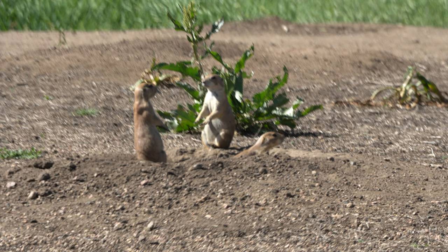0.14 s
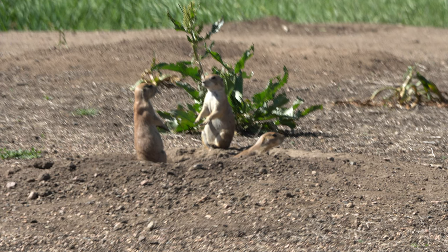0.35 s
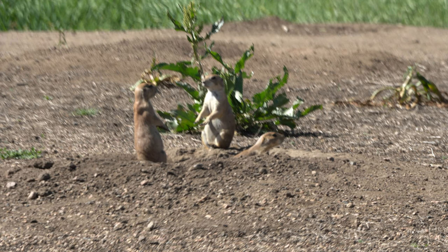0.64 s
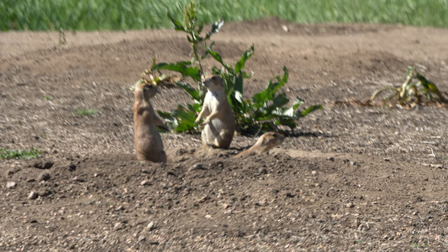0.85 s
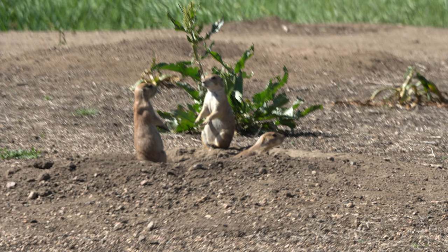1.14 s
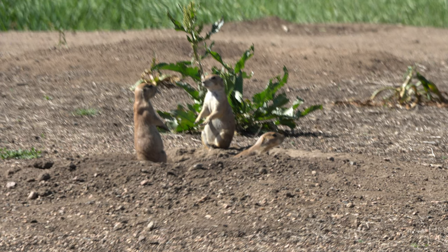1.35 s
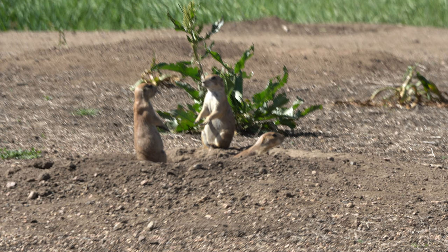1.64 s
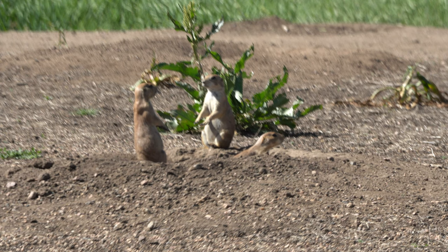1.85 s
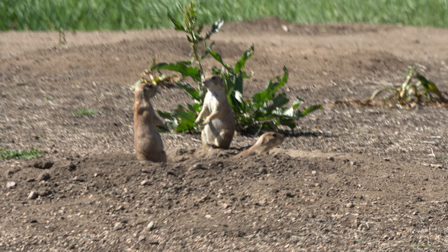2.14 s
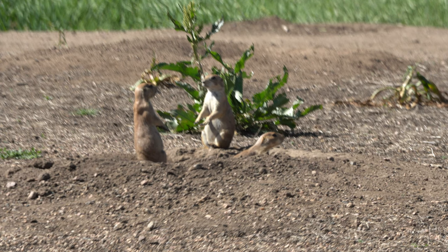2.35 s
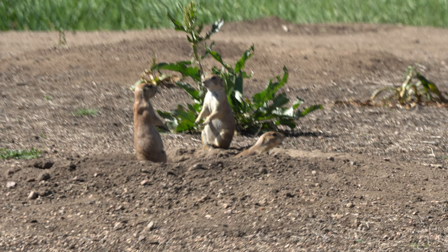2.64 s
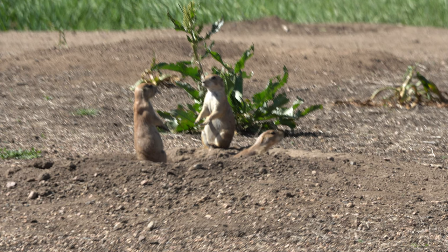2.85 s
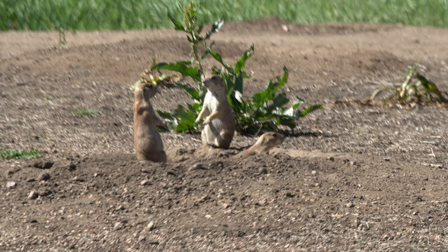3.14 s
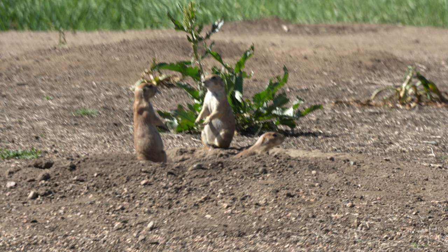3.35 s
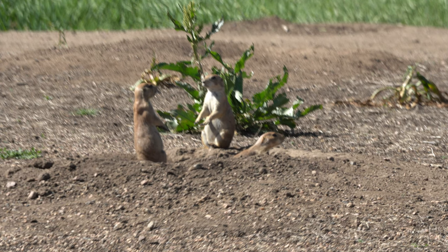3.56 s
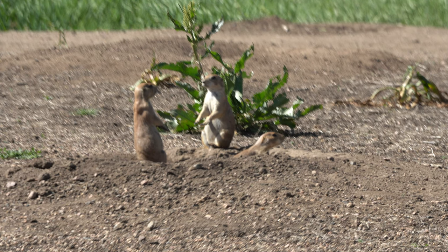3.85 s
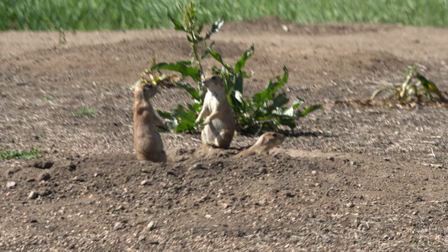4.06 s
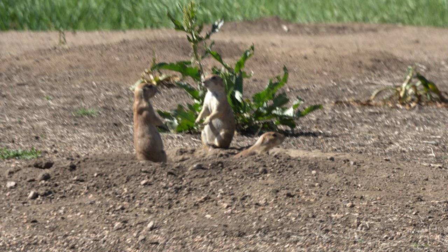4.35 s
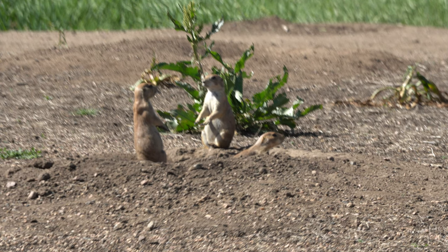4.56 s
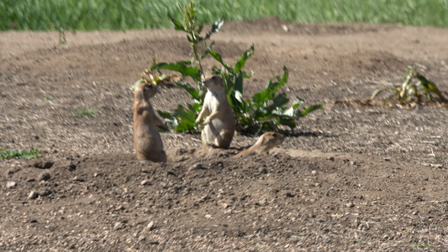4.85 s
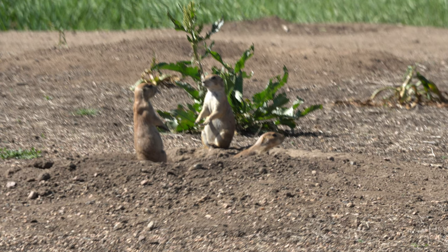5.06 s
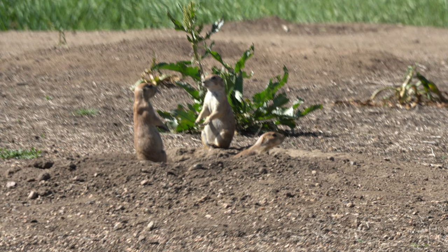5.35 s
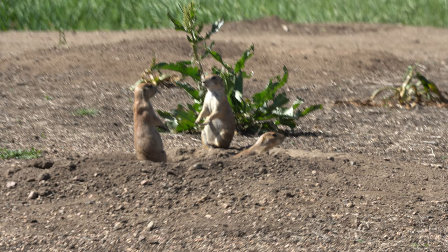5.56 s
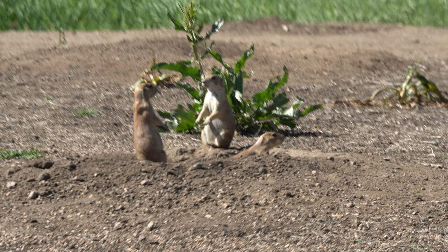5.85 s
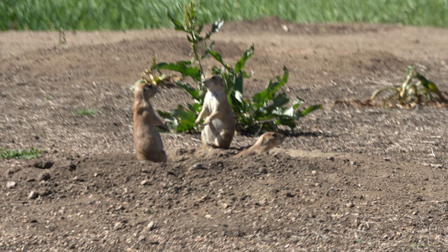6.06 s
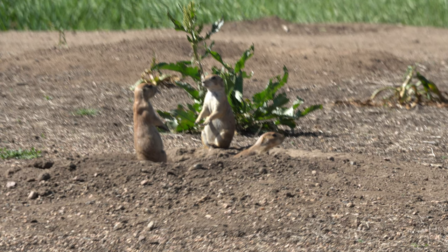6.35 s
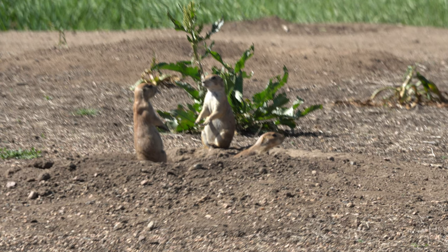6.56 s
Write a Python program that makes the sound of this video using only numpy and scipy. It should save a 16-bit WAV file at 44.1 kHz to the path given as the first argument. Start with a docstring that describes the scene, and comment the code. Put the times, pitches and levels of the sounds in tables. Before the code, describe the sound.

A soft, steady rush of distant traffic and light microphone hiss fills open ground throughout. A prairie dog gives a short, high, slightly raspy bark right at the start and another at 1.2 seconds, each followed by a faint smeared echo. A far engine drones weakly underneath and draws away by about 2.5 seconds, while a few thin bird whistles slide upward. At 2.8 seconds a second prairie dog barks once near the microphone, cleaner and much louder than anything else. The first barks again at about 3.3, 4.2, 5.1 and 6 seconds, its tone shifting a little each time. From 3 seconds, songbirds further off grow busier with quick chips and sliding notes. One sings a rapid trill from 4.2 to 5.1 seconds. More chips follow, then a fainter trill from 6 to 6.6 seconds, over a dim shimmer of distant birds.

```python
"""Two burrowing rodents bark alarms on open ground: short whistles from trembling vocal folds.
One calls again and again, turning its head; the other, near the microphone, barks once, loudly.
Distant banks send back a smeared echo. Further off, songbirds chip, slide and trill in near-sine tones
among bushes. Far traffic roars steadily, an engine drones and draws away, and the microphone hisses."""
import sys
import numpy as np
from scipy import signal
from scipy.fft import rfft, irfft
from scipy.io import wavfile
from scipy.ndimage import uniform_filter1d

SR = 44100
rng = np.random.default_rng(int(sys.argv[2]) if len(sys.argv) > 2 else 0)


def wav_record(signal):
    """Record a signal, one row per channel, as 16-bit PCM in the file named by sys.argv[1]."""
    frames = np.transpose(np.atleast_2d(signal))
    bounded = np.clip(frames, -1, 1)
    # unit amplitude maps onto the largest positive 16-bit level
    quanta = np.round(bounded * 32767).astype(np.int16)
    wavfile.write(sys.argv[1], SR, quanta)


N = 296352

# the regular caller: t/s, length/s, attack/s, time to the pitch break/s, plateau f/Hz, level/dB,
# then, as its head turns, fundamental gain/dB and third harmonic gain/dB
BARKS = [(0.0938, .083, 0.0027, 0.022, 2035, -29.5, -5, 7), (1.184, .076, 0.0083, .0232, 1950, -33, -1, 10),
         (3.267, 0.076, 0.0036, 0.021, 1970, -30.5, 0, 10.5),
         (4.192, 0.071, 0.0042, 0.016, 1933, -30, -1, 6), (5.095, .083, 0.0043, .0229, 1993, -34, 4.5, 9),
         (6.046, .082, 0.0031, 0.022, 1983, -30, 2.5, -6)]
# its mouth and throat colour: f/Hz, gain/dB
THROAT = [(1500, -54), (1800, -17.5), (1960, -14.5), (2320, -3.5), (3200, -5), (3850, -0.15), (4200, -9),
          (4650, -17.5), (5500, -14), (6000, -9), (6900, -3), (7300, -18), (8300, -29), (9300, -15),
          (12000, -33)]
# its vocal folds, from the fundamental up: level/dB
FOLD_HARMONICS = [1.93, 3.5, -7, -8.5, -13.5, -25]
# the one bark near the microphone: t/s, f/Hz, level/dB
NEAR_BARK = [(2.7915, 1460, -59.5), (2.794, 1510, -24), (2.802, 1814, -12), (2.812, 1898, -12.5),
             (2.822, 1846, -10.5), (2.838, 1753, -13.5), (2.852, 1710, -20), (2.859, 1560, -23.5),
             (2.866, 1310, -37), (2.87, 1320, -70)]
# its harmonics, from the fundamental up: level/dB
NEAR_HARMONICS = [-19, 0, -21, -27, -43, -46, -60]
# echoes of the regular caller, the near caller and the birds among bushes:
# early scatter level/dB, its loss/(dB/s), late peak t/s, its level/dB, swell/(dB/s), loss/(dB/s)
REGULAR_ECHO = (-17, 264, 0.23, -17, 163, 57)
NEAR_ECHO = (-39, 80, .2, -29, 110, 80)
BUSH_ECHO = (-1, 170, .1, -22, 100, 70)
# the regular caller sends other harmonics round about than straight ahead, colouring its echo: f/Hz, gain/dB
ECHO_COLOUR = [(1900, 8), (2350, 4.5), (3400, 7.5), (3900, -2), (5500, 1), (7200, -2.5), (10000, -12)]
# bird chips that scoop up to their pitch: t/s, top f/Hz, scoop depth/Hz, level/dB
CHIPS = [(2.336, 3220, 200, -57), (3.147, 6780, 454, -59.5), (3.216, 4340, 394, -46.5),
         (3.232, 6120, 1000, -58), (3.253, 5950, 640, -47.5), (3.335, 5250, 400, -56),
         (3.353, 4900, 390, -51.5), (3.377, 4570, 270, -46.5), (3.393, 4256, 80, -43),
         (3.408, 4050, 200, -44), (3.624, 4960, 400, -53), (3.79, 3780, 444, -45), (3.811, 4240, 378, -42),
         (5.228, 4870, 60, -58.5), (5.476, 2780, 60, -53), (5.492, 3200, 450, -59), (5.563, 3710, 700, -50),
         (5.618, 2710, 60, -55.5), (5.649, 3200, 650, -51.5), (5.718, 3730, 740, -49),
         (5.762, 2730, 60, -54), (5.9, 2790, 80, -58), (5.908, 5660, 460, -55.5), (6.56, 2850, 151, -50.5),
         (6.68, 2930, 161, -55.5)]
# sliding bird whistles: t/s, length/s, first f/Hz, last f/Hz, level/dB
SLIDES = [(.5, 0.69, 2780, 2775, -77), (1.02, 0.2, 2775, 2990, -59), (1.584, .077, 5450, 5850, -70),
          (1.654, 0.063, 2930, 3200, -60.5), (1.677, .055, 5000, 5500, -68), (2.279, .15, 2717, 3100, -61),
          (3.641, 0.029, 7240, 5030, -63), (3.711, .027, 6700, 5800, -61), (3.739, .022, 7220, 3660, -57),
          (3.427, .035, 4050, 3860, -52), (3.823, .045, 4250, 3750, -40.5), (3.858, .06, 3840, 2550, -47),
          (4.011, 0.016, 7200, 5030, -54.5), (4.019, 0.02, 5040, 7000, -51.5),
          (4.072, 0.0128, 7500, 5350, -51), (4.083, 0.02, 5330, 7170, -49), (4.132, 0.059, 6130, 3640, -44),
          (5.248, .015, 4870, 6040, -56), (5.533, 0.16, 4147, 4140, -56), (5.688, 0.15, 4050, 4170, -54),
          (5.923, 0.11, 5750, 5640, -63)]
# one rising trill syllable: t/s, f/Hz, level/dB
SYLLABLE = [(0, 2380, -18), (.016, 2530, -10), (.025, 3100, -5), (.032, 3620, -2), (.044, 3860, 0),
            (.048, 3880, -20)]
# trills of that syllable: t/s, syllable count, spacing/s, level/dB, loss per syllable/dB
TRILLS = [(4.211, 11, .084, -41.5, .1), (5.981, 7, .0845, -51, .6)]
# rise and fall of the far bird chorus: t/s, level/dB
CHORUS_LEVEL = [(0, -70), (1.0, -64), (2.0, -69), (2.5, -66.5), (3.6, -61), (4.2, -67.5), (5.2, -64.5),
                (5.8, -62), (6.3, -56.5), (6.72, -65.5)]
# its colour: f/Hz, level/dB
CHORUS_COLOUR = [(1500, -39.5), (2300, -5), (2800, -4), (3500, -10.5), (4800, -16), (6000, -19),
                 (8000, -37.5)]
# firing rate of the far engine: t/s, f/Hz
ENGINE_FIRING = [(0, 54.9), (.2, 55.6), (.55, 60.2), (1.0, 60.16), (1.6, 61.1), (2.4, 61.05)]
# its orders that reach the microphone: multiple of the firing rate, level/dB, swell peak t/s
ENGINE_ORDERS = [(5, -78, 1.42), (7, -71.5, 0.11), (8, -73, 1.64), (9, -73.5, 0.99), (10, -71.5, 0.65)]
# colour of far traffic and microphone hiss together: f/Hz, level/dB
ROAR_COLOUR = [(24, -86), (40, -62.5), (235, -27), (378, -18.5), (474, -12.5), (862, -3), (953, -3),
               (1250, -7.5), (3320, -35), (12000, -31.5), (15600, -35.5)]

# the regular bark's pitch against its plateau: starts below, humps up, breaks back, sags, falls away
START_HZ, HUMP_HZ, HUMP_RISE_S, BREAK_S = -230, 402.5, .00549, .0019
SETTLE_HZ, SETTLE_S, SAG_HZ_PER_S, FALL_HZ, FALL_S = 107, .01306, 900, 475, .0066
RELEASE_S, EDGE_DB, RASP_DB, RASP_FOLLOWS_TURN = .0049, -22, -11, .3
CHIP_S, SCOOP_S, WAVER_SHARE, SYLLABLE_SPREAD_DB, BUSH_SHADE_DB = .025, .008, .008, .7, -2.5
ENGINE_LEAVES_S, ENGINE_LOSS_DB_PER_S = 1.5, 18.5
ORDER_SWELL_DB, ORDER_SWELL_S, ORDER_WAVER_DB = 9, .13, 3.5
ROAR_DB, CUTOFF_HZ = -54.5, 15750


def regular_caller():
    """Barks shaped by throat and head turn; returns the sound at the microphone and that sent all round."""
    straight, around, breath = np.zeros((3, N))
    for start, length, attack, break_at, plateau_hz, db, fundamental_db, third_db in BARKS:
        t = np.arange(0, length, 1 / SR)
        hz = bark_pitch(t, length, break_at, plateau_hz)
        effort_db = EDGE_DB * (np.maximum(1 - t / attack, 0) ** 2 + np.exp((t - length) / RELEASE_S))
        gains = [amp(at_hz(THROAT, k * hz) + fold_db) for k, fold_db in enumerate(FOLD_HARMONICS, 1)]
        harmonics = vocal_folds(hz, gains, jitter=.007, shimmer_db=.8, half_db=-24, slips_per_s=100)
        facing = amp([fundamental_db, 0, third_db, third_db / 2, third_db / 2 - 1, third_db / 2 + 2])
        add(straight, start, amp(db + effort_db) * (facing @ harmonics))
        add(around, start, amp(-32.5 + effort_db) * harmonics.sum(axis=0))  # whichever way it faces
        add(breath, start, amp(db + RASP_DB + RASP_FOLLOWS_TURN * third_db + effort_db))
    air = signal.sosfilt(signal.butter(4, [2500, 7000], "band", fs=SR, output="sos"), rng.standard_normal(N))
    rasp = breath * filtered(air, THROAT) * amp(3 * drift(200, N))  # turbulent air past the folds
    return straight + rasp, around + rasp


def bark_pitch(t, length, break_at, plateau_hz):
    """The pitch of one bark humps up, drops to a sagging plateau and falls away at the end."""
    since_break = np.maximum(t - break_at, 0)
    hump = HUMP_HZ - (HUMP_HZ - START_HZ) * np.exp(-t / HUMP_RISE_S)
    settle = SETTLE_HZ * np.exp(-since_break / SETTLE_S) - SAG_HZ_PER_S * (t - length / 2)
    fall = FALL_HZ * np.exp((t - length) / FALL_S)
    hz = plateau_hz + settle + (hump - settle) * np.exp(-since_break / BREAK_S) - fall
    return uniform_filter1d(hz, size=60)


def near_caller():
    """One cleaner, louder bark near the microphone, its second harmonic far on top."""
    out = np.zeros(N)
    start, (hz, db) = sampled(NEAR_BARK)
    hz, db = uniform_filter1d(hz, size=150), uniform_filter1d(db, size=60)
    harmonics = vocal_folds(hz, amp(NEAR_HARMONICS), jitter=.0017, shimmer_db=.18, half_db=-32, slips_per_s=0)
    add(out, start, amp(db) * harmonics.sum(axis=0))
    return out


def vocal_folds(hz, gains, jitter, shimmer_db, half_db, slips_per_s):
    """Harmonics, one a row, on a trembling pitch; strong-weak cycles add faint lines half-way between."""
    size, longest = len(hz), 4000
    phase = 2 * np.pi * np.cumsum(hz * (1 + jitter * drift(440, longest)[:size])) / SR
    # now and then a cycle slips early or late
    slips = (rng.random(longest) < slips_per_s / SR) * rng.normal(0, .45, longest)
    phase += np.cumsum(uniform_filter1d(slips, size=22))[:size]
    harmonics = np.array([gain * np.sin((k + 1) * phase + k * k) for k, gain in enumerate(gains)])
    uneven = amp(half_db + 3.7 * drift(40, longest)[:size]) * np.sin(phase / 2)
    shimmer = amp(shimmer_db * drift(340, longest)[:size])
    return harmonics * shimmer * (1 + uneven)


def echo(sound, profile):
    """Many weak reflections: early scatter dies away, then distant banks or bushes answer in a swell."""
    early_db, early_loss, delay, late_db, swell, loss = profile
    t = np.arange(SR) / SR
    early = amp(early_db - early_loss * t)
    late = amp(late_db - np.where(t < delay, swell * (delay - t), loss * (t - delay)))
    scatter = rng.standard_normal(SR) * (early + late) / np.sqrt(.07 * SR)  # scaled for a 70 ms call
    return signal.fftconvolve(sound, scatter)[:N]


def songbirds():
    """Birds further off in the bushes: near-sine chips, slides and trills of one rising syllable."""
    out = np.zeros(N)
    waver = 1 + WAVER_SHARE * drift(60, N)
    scoop = np.exp(-np.arange(0, CHIP_S, 1 / SR) / SCOOP_S)
    for start, top_hz, scoop_hz, db in CHIPS:
        add(out, start, whistle(top_hz - scoop_hz * scoop, db))
    for start, length, first_hz, last_hz, db in SLIDES:
        hz = np.geomspace(first_hz, last_hz, int(length * SR))
        add(out, start, whistle(hz * waver[round(start * SR):][:len(hz)], db))
    _, (hz, shape_db) = sampled(SYLLABLE)
    syllable = amp(shape_db) * np.sin(2 * np.pi * np.cumsum(hz) / SR)
    for start, count, spacing, db, loss_db in TRILLS:
        spread_db = rng.normal(0, SYLLABLE_SPREAD_DB, 20)
        for k in range(round(count)):
            add(out, start + k * spacing, amp(db - k * loss_db + spread_db[k]) * syllable)
    return out * amp(2.5 * drift(120, N))  # air turbulence flutters the level


def whistle(hz, db):
    """One bird note: a sine on a pitch path, with rounded ends."""
    envelope = amp(db) * np.sin(np.linspace(0, np.pi, len(hz))) ** .5
    return envelope * np.sin(2 * np.pi * np.cumsum(hz) / SR)


def far_chorus():
    """Birds too distant and scattered to tell apart, blurred into a patchy shimmer of noise."""
    level_db = np.interp(np.arange(N) / SR, *np.transpose(CHORUS_LEVEL))
    return coloured_noise(CHORUS_COLOUR, 1500, 8000) * amp(level_db + 2.35 * drift(4.4, N))


def far_engine():
    """A distant engine gathers speed and draws away; each order swells once and wavers by chance."""
    t = np.arange(N) / SR
    phase = 2 * np.pi * np.cumsum(np.interp(t, *np.transpose(ENGINE_FIRING))) / SR
    drone = np.zeros(N)
    for multiple, db, peak_at in ENGINE_ORDERS:
        swell_db = ORDER_SWELL_DB * np.exp(-.5 * ((t - peak_at) / ORDER_SWELL_S) ** 2)
        drone += amp(db + swell_db + ORDER_WAVER_DB * drift(1.7, N)) * np.sin(multiple * phase)
    return drone * amp(-ENGINE_LOSS_DB_PER_S * np.maximum(t - ENGINE_LEAVES_S, 0))


def traffic_and_hiss():
    """Far traffic and the microphone's own hiss, one smooth and steady bed of noise."""
    return coloured_noise(ROAR_COLOUR, 400, 1400) * amp(ROAR_DB)


def amp(db):
    """Decibels to gain."""
    return 10 ** (np.asarray(db) / 20)


def at_hz(colour, hz):
    """Level of an (f/Hz, level/dB) colour, read on a log-frequency axis."""
    points_hz, db = np.transpose(colour)
    return np.interp(np.log(hz), np.log(points_hz), db)


def filtered(sound, colour):
    """A sound through an (f/Hz, gain/dB) colour."""
    hz = np.maximum(np.arange(N // 2 + 1) * SR / N, 1)
    return irfft(rfft(sound) * amp(at_hz(colour, hz)), N)


def coloured_noise(colour, low_hz, high_hz):
    """Noise of a given colour whose part between two frequencies has rms 1."""
    noise = filtered(rng.standard_normal(N), colour)
    band = signal.butter(6, [low_hz, high_hz], "band", fs=SR, output="sos")
    return noise / signal.sosfilt(band, noise).std()


def drift(rate_hz, size):
    """Random wander of spread 1, mostly slower than the given rate."""
    pole = np.exp(-2 * np.pi * rate_hz / SR)
    wander = signal.lfilter([1], [1, -2 * pole, pole * pole], rng.standard_normal(size + 9000))[9000:]
    return wander / wander.std()


def add(track, start, sound):
    """Mix a sound in at a time in seconds."""
    i = round(start * SR)
    track[i:i + len(sound)] += sound[:N - i]


def sampled(rows):
    """Start time and the other columns of a (t/s, ...) table at every sample."""
    times, *columns = np.transpose(rows)
    t = np.arange(times[0], times[-1], 1 / SR)
    return times[0], [np.interp(t, times, column) for column in columns]


def scene():
    """One microphone on open ground: rodents, birds and their echoes over the far traffic."""
    straight, around = regular_caller()
    near, song = near_caller(), songbirds()
    echoes = echo(filtered(around, ECHO_COLOUR), REGULAR_ECHO) + echo(near, NEAR_ECHO)
    echoes += echo(song, BUSH_ECHO)
    shaded_song = amp(BUSH_SHADE_DB) * song  # bushes shade the straight path from the birds
    calls = straight + near + shaded_song + echoes + far_chorus()
    low_cut = signal.butter(4, 900, "high", fs=SR, output="sos")  # the calls and the chorus carry nothing below about 900 Hz
    return (signal.sosfilt(low_cut, calls) + traffic_and_hiss() + far_engine())[None]


def record(dry):
    """A steep low-pass cuts the top treble from the microphone's signal."""
    return signal.sosfilt(signal.ellip(14, .3, 60, CUTOFF_HZ, fs=SR, output="sos"), dry)


dry = scene()
out = record(dry)
wav_record(out)
```